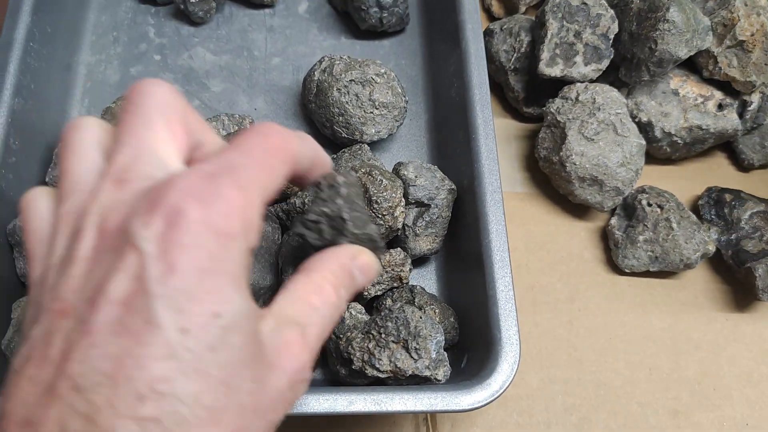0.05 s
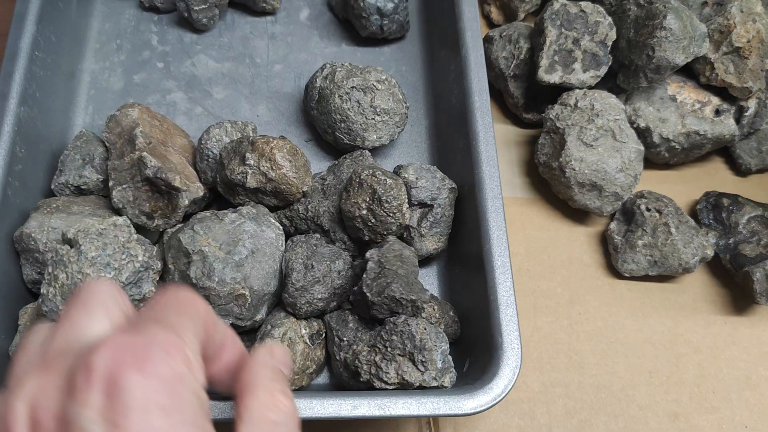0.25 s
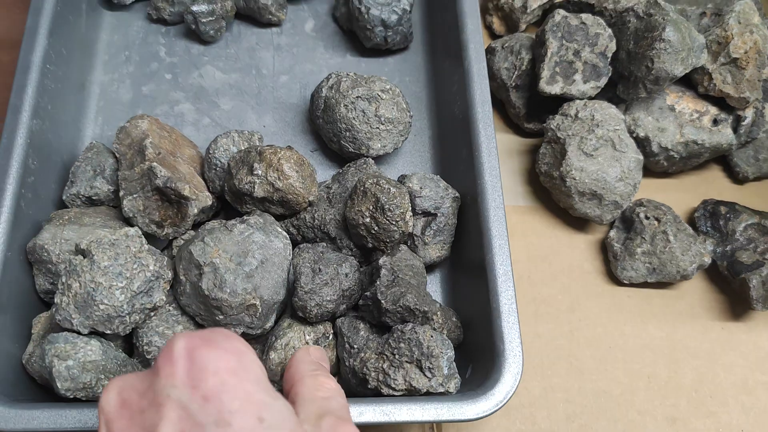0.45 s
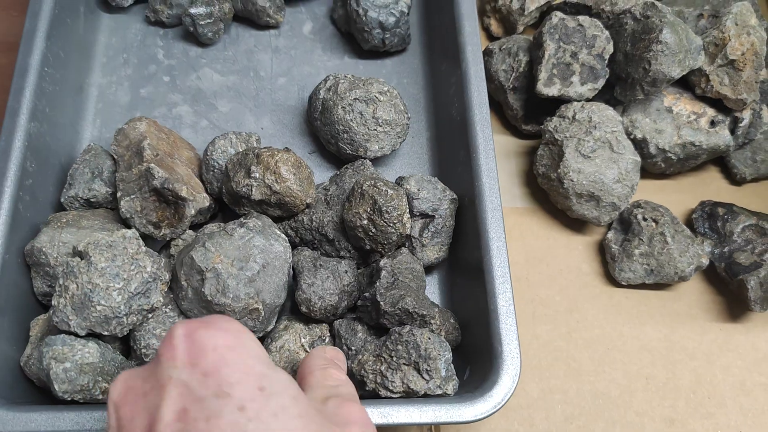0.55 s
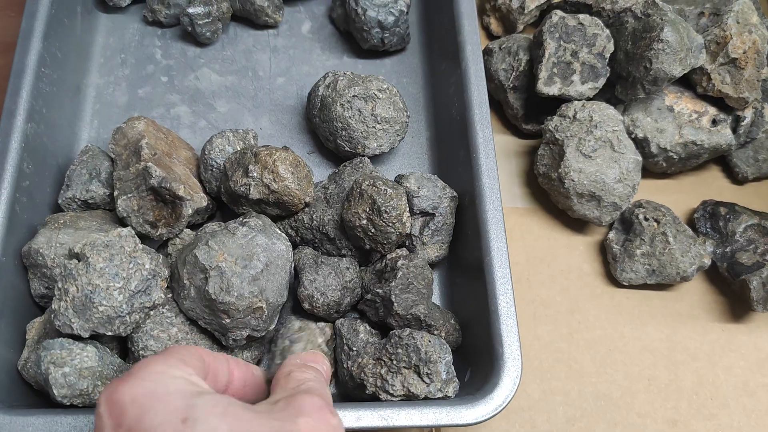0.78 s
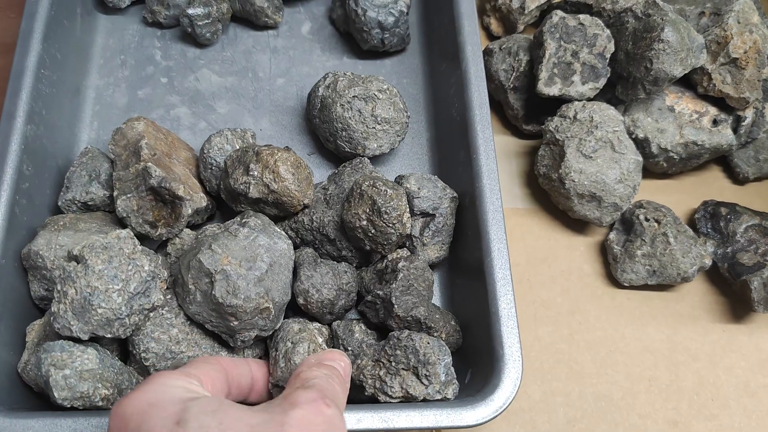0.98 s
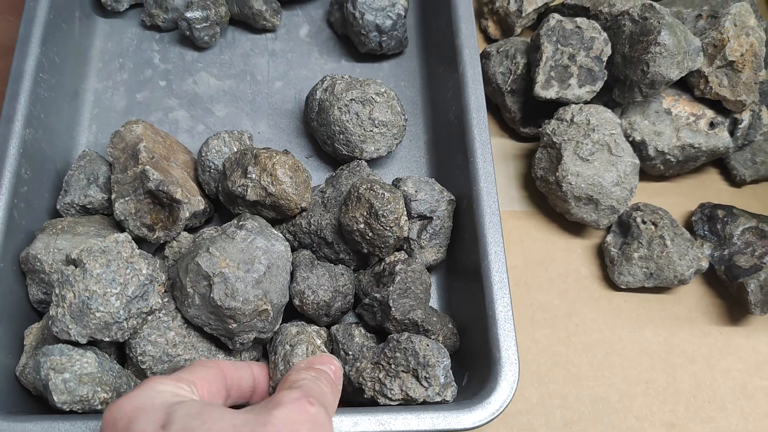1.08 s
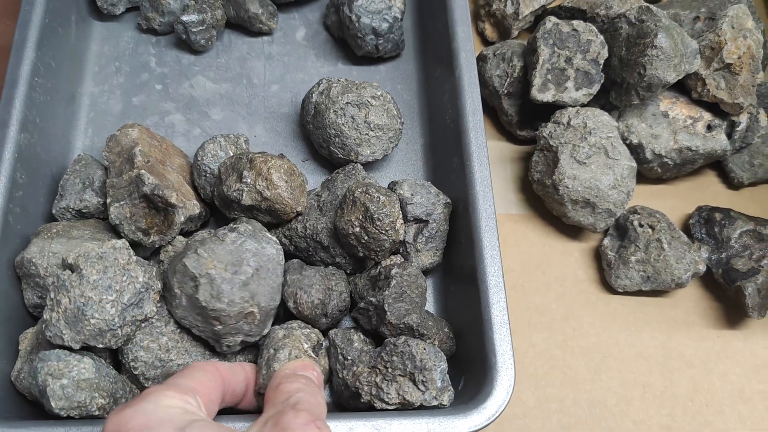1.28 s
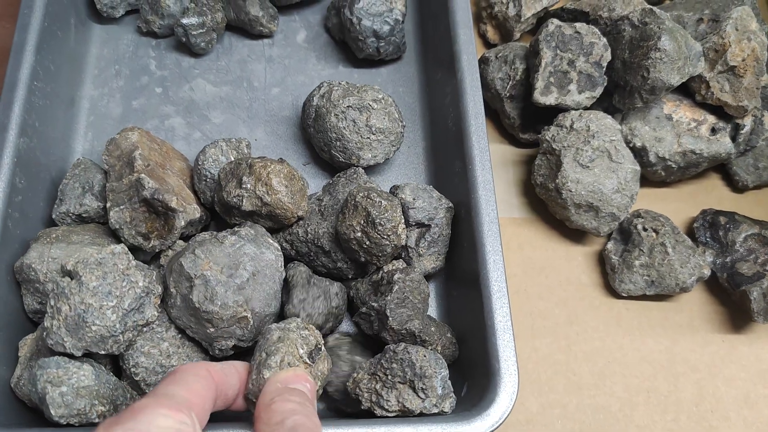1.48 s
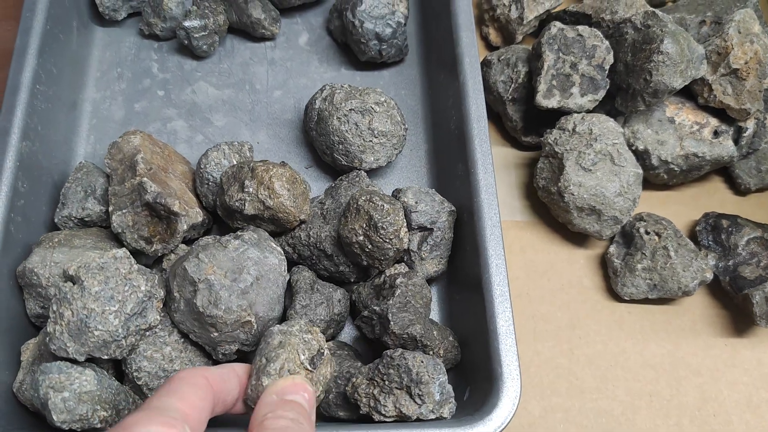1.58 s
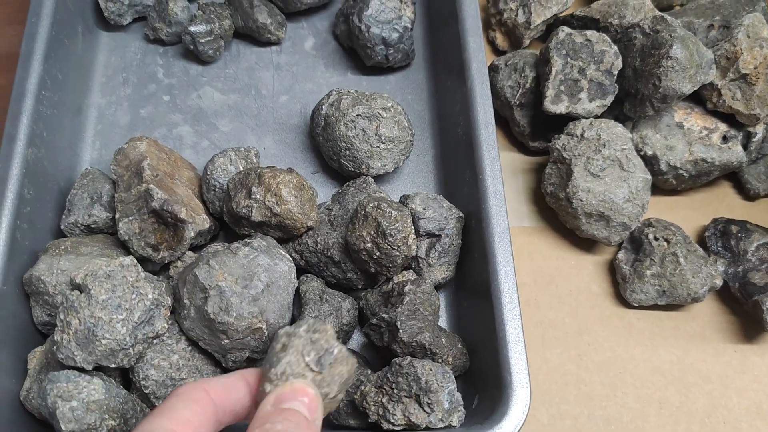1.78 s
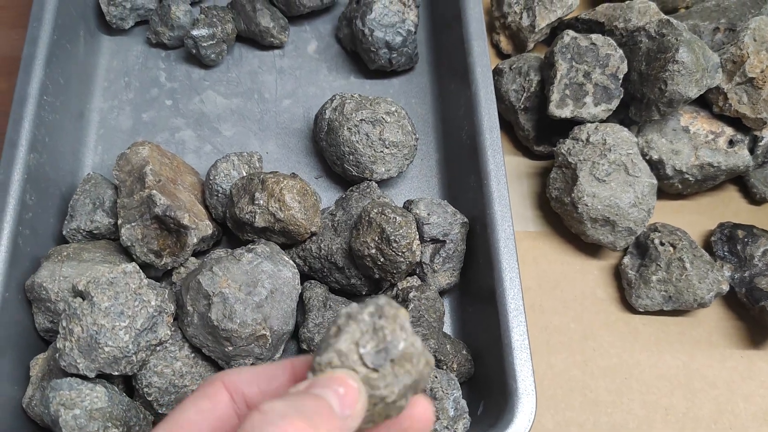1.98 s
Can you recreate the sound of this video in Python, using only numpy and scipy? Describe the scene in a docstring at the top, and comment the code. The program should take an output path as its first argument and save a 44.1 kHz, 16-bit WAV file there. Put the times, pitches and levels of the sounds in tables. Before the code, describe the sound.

Stones clack and scrape against each other in a metal tray as a hand moves them

```python
"""Stones in a metal tray

A hand sets a lump of stone down on a heap of others in a metal baking tray, then works a second one loose
and lifts it. Knocks and scrapes are shaped noise in four bands, square hits add decaying sine modes,
the loaded tray rings through resonances, and rubs and thumps stir its floor.
A small room answers with a noise tail over still air and a hum, heard by a close stereo microphone."""
import sys
import numpy as np
from scipy import signal
from scipy.fft import rfft, irfft, next_fast_len
from scipy.io import wavfile

SR = 44100
rng = np.random.default_rng(int(sys.argv[2]) if len(sys.argv) > 2 else 0)


def store_wav(level_fs):
    """Save 16-bit WAV to argv[1]."""
    pcm = np.round(np.clip(np.atleast_2d(level_fs), -1, 1) * 32767)
    wavfile.write(sys.argv[1], SR, pcm.T.astype(np.int16))


N = 90404  # length [samples]


def amp(db):
    """Decibels to gain."""
    return 10 ** (np.asarray(db) / 20)


def unit(x):
    """Scale to rms 1."""
    return x / np.sqrt(np.mean(x ** 2) + 1e-20)


def decay(t, t60):
    """Exponential ring-out that falls 60 dB in t60 seconds."""
    return np.exp(-np.log(1000) * t / t60)


def along(points, hz):
    """Read a curve of (frequency, value) points on a log frequency axis."""
    f, v = np.transpose(points)
    return np.interp(np.log(hz + 1), np.log(f + 1), v)


def filtered(x, response):
    """Multiply the spectrum of x by a response of frequency, zero-padded against wrap-around."""
    n = x.shape[-1]
    m = 2 * next_fast_len(n * 3 // 4)
    spectrum = rfft(x, m) * response(np.fft.rfftfreq(m, 1 / SR))
    return irfft(spectrum, m)[..., :n]


def coloured(x, points):
    """Causal (minimum-phase) colour that keeps the power of white noise."""
    def response(hz):
        cepstrum = irfft(np.log(unit(amp(along(points, hz)))))
        # fold the later half onto the earlier one, so nothing sounds ahead of its cause
        cepstrum[1:len(cepstrum) // 2] *= 2
        cepstrum[len(cepstrum) // 2 + 1:] = 0
        return np.exp(rfft(cepstrum))
    return filtered(x, response)


def resonances(x, modes):
    """Sum of band-pass resonances (frequency [Hz], width [Hz], level [dB]) driven by x."""
    def response(f):
        return sum(amp(db) * 1j * f * width / (hz * hz - f * f + 1j * f * width)
                   for hz, width, db in modes)
    return filtered(x, response)


def add(out, x, s):
    """Mix x into out from time s, trimmed at both ends."""
    i = round(s * SR)
    part = out[:, max(i, 0):max(i + x.shape[1], 0)]
    part += x[:, max(-i, 0):][:, :part.shape[1]]


# colour of the still room air: (frequency [Hz], relative level [dB])
AIR_COLOUR = [(10, 3), (25, -11), (45, -9), (75, -9), (110, -21), (180, -21), (270, -17.5), (450, -26.5),
              (700, -35.5), (3000, -34.5), (8400, -49), (16000, -42)]
AIR_DB, HUM_HZ, HUM_DB = -56, 185.5, -67  # rms levels ahead of the stereo stage


def background():
    """Still room air as coloured noise, and the hum of an appliance as one steady sine."""
    air = unit(coloured(rng.standard_normal((2, N)), AIR_COLOUR))
    hum = np.sqrt(2) * np.sin(2 * np.pi * HUM_HZ * np.arange(N) / SR)
    return amp(AIR_DB) * air + amp(HUM_DB) * hum


# reverberation of the small room: (frequency [Hz], decay by 60 dB [s])
ROOM_T60 = [(150, 0.34), (500, 0.21), (1500, 0.2), (4000, 0.14), (12000, 0.14)]
ROOM_DB, ROOM_BUILD_S = -8.5, 0.0024


def room(x):
    """A short diffuse tail of decaying noise, the treble dying first."""
    hz, t, z = signal.stft(rng.standard_normal((2, SR // 2)), SR, nperseg=256)
    fading = z * decay(t, along(ROOM_T60, hz)[:, None])
    tail = signal.istft(fading, SR, nperseg=256)[1]
    tail = tail * (1 - np.exp(-np.arange(tail.shape[1]) / SR / ROOM_BUILD_S))
    tail = tail / np.linalg.norm(tail[0])
    return amp(ROOM_DB) * signal.fftconvolve(x, tail, axes=1)[:, :N]


# weight of a lump or of the hand on the tray and table: (time [s], starting level [dB])
THUMP_HITS = [(.218, -39), (.56, -52), (.701, -52), (1.09, -55.5), (1.618, -48)]
# dull colour of the shudder: (frequency [Hz], relative level [dB])
THUMP_COLOUR = [(30, -16), (85, -5.5), (165, 2.5), (230, -4), (400, -0.5), (600, -16.5), (2000, -58)]
THUMP_T60 = 0.24  # s


def thumps():
    """Weight shakes the tray and the table: a low, dull burst of noise that dies away."""
    out, t = np.zeros((2, N)), np.arange(SR // 2) / SR
    for s, db in THUMP_HITS:
        shudder = unit(coloured(rng.standard_normal((2, len(t))), THUMP_COLOUR))
        add(out, amp(db) * shudder * decay(t, THUMP_T60), s)
    return out


# a stone rubs or rocks on the tray's floor: (time of hardest push [s], rise [s], fall [s], level [dB])
FLOOR_RUBS = [(0.285, 0.011, .03, -25.5), (.528, 0.012, .03, -36.5), (1.435, .06, 0.097, -46),
              (1.555, 0.066, 0.15, -44.5), (1.666, .012, 0.015, -26.5)]
# the floor's resonances under a stone: (frequency [Hz], width [Hz], relative level per pass [dB])
FLOOR_MODES = [(603, 70, 0.5), (1033, 170, -5.5), (1505, 170, -6)]
SWING_DB = 20  # change of level over one rise or fall, for rubs and scrapes


def rubs():
    """Friction stirs the tray's floor into an unsteady drone for as long as the stone is pushed."""
    t = np.arange(N) / SR
    power = sum(amp(db - SWING_DB * np.maximum((s - t) / rise, (t - s) / fall)) ** 2
                for s, rise, fall, db in FLOOR_RUBS)
    drone = resonances(rng.standard_normal((2, N)), FLOOR_MODES)
    drone = resonances(drone, FLOOR_MODES)  # a second pass narrows the bands
    return np.sqrt(power) * unit(drone)


# modes of the loaded tray: (frequency [Hz], relative level [dB], decay by 60 dB [s])
TRAY_MODES = [(161.6, 5.5, 0.17), (579, -4.5, 0.15), (625.6, 3.5, 0.079), (858, -4.5, 0.35),
              (965, -6.5, .2), (1096, -16.5, 0.15), (1314, 0.5, 0.15), (1505, -16, 0.45),
              (1572, -11.5, 0.12), (1690, -19, 0.088), (2095, 0.5, 0.19), (2770, -4.5, 0.36),
              (3557, -5, 0.077), (4390, -10, 0.2)]
TRAY_DB = -0.5  # trim on all modes


def tray(x):
    """The sheet metal rings with whatever the stones pass down to it."""
    modes = [(hz, np.log(1000) / (np.pi * t60), db) for hz, db, t60 in TRAY_MODES]
    return amp(TRAY_DB) * resonances(x, modes)


# thud of the stone into the tray: (frequency [Hz], relative level [dB])
THUD_COLOUR = [(30, -20), (90, -12), (170, -6), (240, -13), (420, -3), (590, 1), (740, -10.5), (1020, 2),
               (1400, -8), (3000, -34.5), (16000, -64.5)]
# clack of a middling stone, shifted to each stone's pitch: (frequency [Hz], relative level [dB])
CLACK_COLOUR = [(30, -44), (200, -22.5), (500, -13), (800, -14), (1150, -4), (1600, -2.5), (2200, -4.5),
                (3200, -14), (4500, -27), (7000, -40.5), (16000, -63.5)]
# hard edge of the contact: (frequency [Hz], relative level [dB])
EDGE_COLOUR = [(100, -29), (1500, -31), (3000, 5), (4200, 3.5), (6000, -0.5), (7500, -12), (10000, -41.5),
               (16000, -45)]
# bright crack: (frequency [Hz], relative level [dB])
CRACK_COLOUR = [(100, -43), (2500, -11), (6000, -7.5), (8000, -2.5), (10500, -3), (13000, -5), (16000, -7)]
CLACK_HZ = 1600  # peak of the unshifted clack


def contact(envelopes, pitch_hz):
    """Noise for thud, clack, edge and crack under four envelopes; stone size sets the clack's pitch."""
    clack = [(hz * pitch_hz / CLACK_HZ, db) for hz, db in CLACK_COLOUR]
    out = 0
    for envelope, colour in zip(envelopes, [THUD_COLOUR, clack, EDGE_COLOUR, CRACK_COLOUR]):
        noise = envelope * rng.standard_normal((2, len(envelope)))
        out = out + np.sqrt(np.mean(envelope ** 2)) * unit(coloured(noise, colour))
    return out


# stone dragged over stone: (time of hardest push [s], rise [s], fall [s], pitch [Hz],
# judder into the tray [dB], grinding [dB], grit [dB])
STONE_SCRAPES = [(.29, 0.038, 0.063, 1880, -40.5, -24.5, -44.5),
                 (0.373, 0.023, 0.12, 1840, -53.5, -52, -63), (.538, 0.032, 0.012, 1950, -40, -33.5, -54.5),
                 (0.586, 0.038, 0.12, 1460, -46, -40.5, -58.5),
                 (0.699, 0.015, 0.0045, 1950, -58, -38, -44.5), (0.669, 0.013, 0.16, 1610, -56, -53.5, -63),
                 (0.863, 0.087, 0.2, 1410, -56.5, -54, -63.5),
                 (.938, 0.065, 0.041, 1960, -42.5, -34.5, -56.5),
                 (1.041, 0.028, 0.036, 1600, -56, -45.5, -46.5),
                 (1.079, 0.047, 0.051, 1450, -47.5, -45.5, -72), (1.129, 0.024, 0.086, 1500, -64, -46, -62),
                 (1.218, 0.099, 0.059, 1474, -54.5, -52.5, -77),
                 (1.415, 0.1, 0.16, 1500, -47.5, -40.5, -63), (1.51, 0.061, 0.096, 2140, -57, -46.5, -60.5),
                 (1.56, 0.11, 0.056, 1400, -51.5, -48.5, -69.5),
                 (1.624, 0.046, 0.015, 1650, -41, -35, -52.5),
                 (1.668, 0.052, 0.04, 1750, -48.5, -30.5, -49),
                 (1.727, 0.039, 0.064, 1514, -57, -41.5, -67), (1.803, 0.015, 0.09, 2037, -50, -50.5, -78)]
SLIPS_PER_S, SLIP_SPREAD_DB, SLIP_S = 420, 4, 0.0024  # rate, scatter of size, life of a slip
SCRAPE_EDGE_DB = -5  # hard edge against the mean of grinding and grit


def scrapes():
    """Rough faces catch and slip at random while the push swells and eases."""
    out, t = np.zeros((2, N)), np.arange(-10000, 10000) / SR
    for s, rise, fall, pitch_hz, judder_db, grind_db, grit_db in STONE_SCRAPES:
        push = amp(-SWING_DB * np.maximum(-t / rise, t / fall))
        sizes = amp(SLIP_SPREAD_DB * np.clip(rng.standard_normal(len(t)), -2, 2))
        slips = (rng.random(len(t)) < SLIPS_PER_S / SR) * sizes ** 2
        # each slip leaves a power that dies away
        power = signal.lfilter([1], [1, -np.exp(-1 / (SLIP_S * SR))], slips)
        chatter = unit(np.sqrt(power))
        edge_db = (grind_db + grit_db) / 2 + SCRAPE_EDGE_DB
        levels = amp([judder_db, grind_db, edge_db, grit_db])
        add(out, contact(levels[:, None] * push * chatter, pitch_hz), s + t[0])
    return out


# square hits that make a whole lump ring with a clear pitch:
# (time [s], pitch [Hz], ring [dB], thud [dB], hard edge [dB], crack [dB])
SQUARE_HITS = [(0.2833, 1658, -9.5, -25.5, -20, -30), (1.6344, 1496, -15, -31, -33, -33),
               (1.6382, 1597, -14.5, -34.5, -33, -34.5)]
# modes of a lump: (frequency [times the pitch], level against the ring [dB], decay by 60 dB [s])
LUMP_MODES = [(.87, -9.5, .028), (1.03, 2, 0.019), (1.3, -13.5, 0.018)]
CLONK_ATTACK_S, CLONK_T60 = 0.00042, 0.037  # rise of the ring, life of the noisy part
CLONK_CLACK_DB = -12  # noisy clack against the ring


def clonks():
    """A square hit rings the lump's few modes for a moment, over a brief crack."""
    out, t = np.zeros((2, N)), np.arange(4096) / SR
    for s, pitch_hz, ring_db, thud_db, edge_db, crack_db in SQUARE_HITS:
        ring = sum(amp(db) * decay(t, t60) * np.sin(2 * np.pi * ratio * pitch_hz * t)
                   for ratio, db, t60 in LUMP_MODES)
        levels = amp([thud_db, ring_db + CLONK_CLACK_DB, edge_db, crack_db])
        hit = contact(np.sqrt(2) * levels[:, None] * decay(t, CLONK_T60), pitch_hz)
        attack = 1 - np.exp(-t / CLONK_ATTACK_S)
        hit[0] += amp(ring_db) * np.sqrt(2) * ring * attack  # the ring sits in the middle
        add(out, hit, s)
    return out


# stone against stone: (time [s], pitch of the clack [Hz], thud into the tray [dB], clack [dB],
# hard edge [dB], crack [dB])
STONE_KNOCKS = [(.218, 1780, -38.5, -23.5, -22, -47), (0.2609, 1650, -32, -28, -22.5, -40.5),
                (.267, 1760, -46, -23, -33, -40), (.279, 1670, -41, -22, -22, -37),
                (.289, 1780, -32, -23.5, -28, -36), (.304, 1600, -40.5, -22, -29.5, -41),
                (0.32, 1880, -38, -30.5, -36, -44), (.329, 1810, -46, -45, -41, -41),
                (.356, 1720, -39.5, -34.5, -64, -73), (0.365, 1900, -40, -33.5, -50, -74),
                (0.479, 1290, -73, -45.5, -62, -63), (.523, 1870, -38, -46, -70, -58),
                (.535, 2210, -43, -26.5, -42, -66), (0.547, 2450, -41.5, -30, -44, -51),
                (.559, 2030, -42, -40, -87, -43), (.587, 1630, -43.5, -52, -43.5, -45),
                (.639, 1690, -70, -42, -61, -75), (.701, 1890, -57, -39, -37, -30),
                (.706, 1800, -54.5, -38.5, -43, -40), (0.846, 1320, -68, -48.5, -69, -69),
                (0.8923, 2000, -56, -63, -63, -52.5), (0.908, 1980, -44, -36, -65, -69),
                (0.9252, 2190, -44, -37, -61, -55), (.934, 2130, -52.5, -35, -59, -53.5),
                (.947, 2220, -56, -36, -47, -52), (.9525, 1950, -47, -40.5, -58, -47.5),
                (1.084, 1890, -72, -34, -45.5, -44), (1.088, 1950, -43, -29.5, -43.5, -48.5),
                (1.191, 1390, -53, -48.5, -76, -78), (1.344, 1350, -64, -44.5, -81, -70.5),
                (1.374, 1390, -56.5, -39.5, -61.5, -71.5), (1.385, 1840, -45.5, -38.5, -52, -66.5),
                (1.4091, 1490, -50, -32.5, -41.5, -45), (1.436, 1630, -42, -38, -41, -61),
                (1.618, 1720, -44, -35.5, -39.5, -42.5), (1.657, 2240, -32, -33, -39.5, -47),
                (1.662, 2080, -35, -35.5, -39.5, -44.5), (1.682, 1550, -45, -39, -44, -51),
                (1.704, 1700, -62, -40, -58, -69), (1.715, 1470, -52, -36, -51.5, -64.5),
                (1.7691, 2110, -41, -24, -38.5, -48), (1.774, 2080, -39, -29.5, -49, -44.5)]
STONE_T60, CHIP_T60 = 0.058, 0.041  # s: ring of a lump (thud, clack), of its edges (edge, crack)
FIRST_S, FIRST_GAIN = 0.00016, 0.27  # the first contact: life, gain against the ring


def knocks():
    """Each blow is a sharp contact and a dense, short ring."""
    out, t = np.zeros((2, N)), np.arange(4096) / SR
    t60 = np.array([STONE_T60, STONE_T60, CHIP_T60, CHIP_T60])[:, None]
    shape = decay(t, t60) + FIRST_GAIN * np.exp(-t / FIRST_S)
    for s, pitch_hz, *levels_db in STONE_KNOCKS:
        add(out, contact(np.sqrt(2) * amp(levels_db)[:, None] * shape, pitch_hz), s)
    return out


# stereo width: (frequency [Hz], side against mid [dB])
SIDE_WIDTH = [(60, -3.5), (150, -15.5), (330, -2), (550, -10), (1100, -6), (1800, 0), (15000, -1.5)]
# stereo balance: (frequency [Hz], left minus right [dB])
LEFT_LEAN = [(200, 0), (1000, -1), (1700, -3.5), (2700, 2.5), (4200, -2), (6400, 4.5), (10000, -1.5),
             (15000, 3)]
LEFT_LEAD_S = 0.00009  # the stones lie a little to the left


def ports(x):
    """Two close ports: width and balance vary with frequency, and the left one hears slightly sooner."""
    def mid_side(hz):
        side = amp(along(SIDE_WIDTH, hz))
        return np.array([np.ones_like(hz), side]) / np.sqrt(1 + side ** 2)

    half = np.array([[.5], [-.5]])  # each ear takes half of the difference

    def ears(hz):
        return amp(half * along(LEFT_LEAN, hz)) * np.exp(2j * np.pi * half * hz * LEFT_LEAD_S)

    mid, side = filtered(x, mid_side)  # the two rows are mid and side up to here
    return filtered(np.array([mid + side, mid - side]), ears)


def scene():
    """Stones, tray and room together."""
    stones = knocks() + clonks() + scrapes()
    heap = stones + tray(stones) + rubs() + thumps()
    return ports(heap + room(heap) + background())


OVERLOAD, TOP_HZ = 0.8, 15780  # ceiling of the rounded peaks, band limit


def record(dry):
    """The hardest peaks are rounded off; nothing is kept above the band limit."""
    rounded = dry / (1 + (dry / OVERLOAD) ** 4) ** (1 / 4)
    return filtered(rounded, lambda hz: hz < TOP_HZ)


dry = scene()
out = record(dry)
store_wav(out)
```